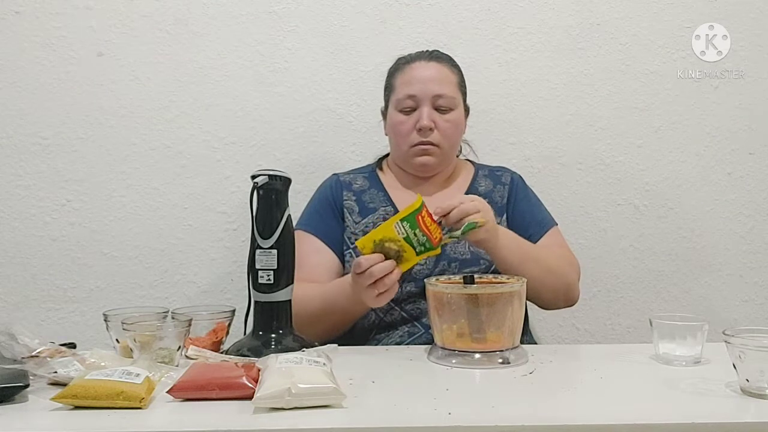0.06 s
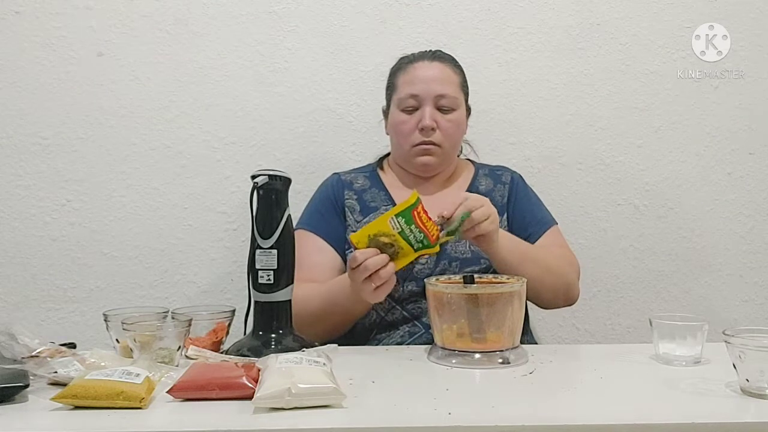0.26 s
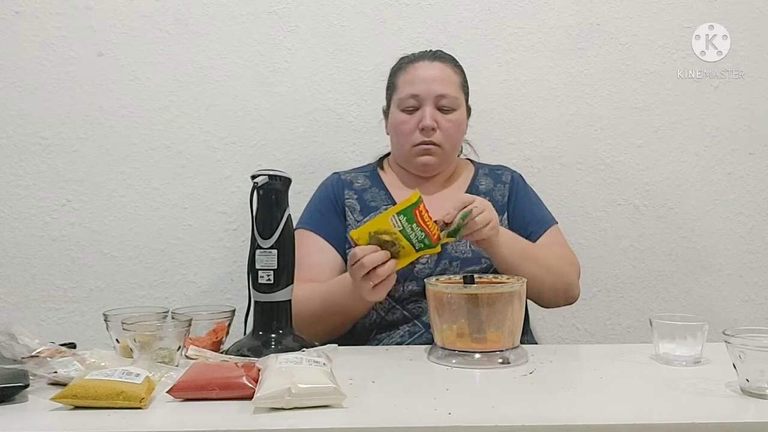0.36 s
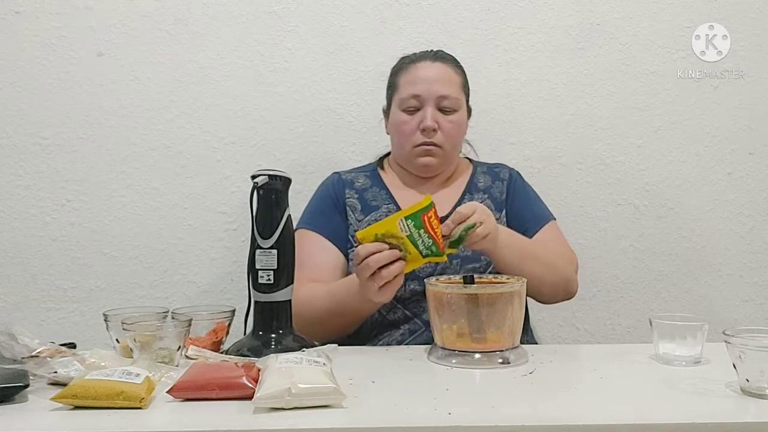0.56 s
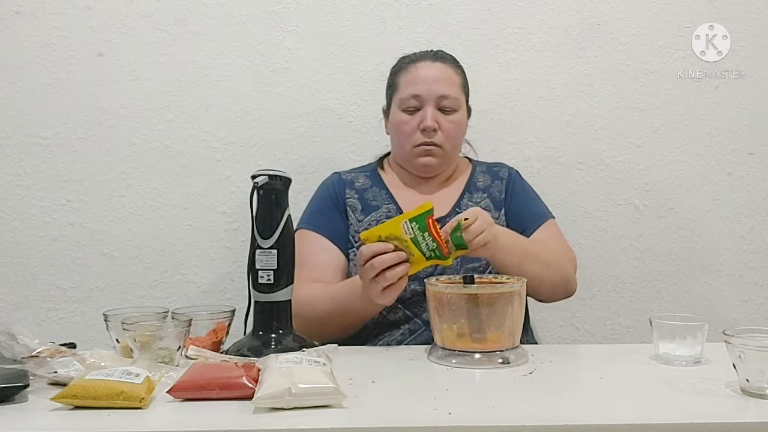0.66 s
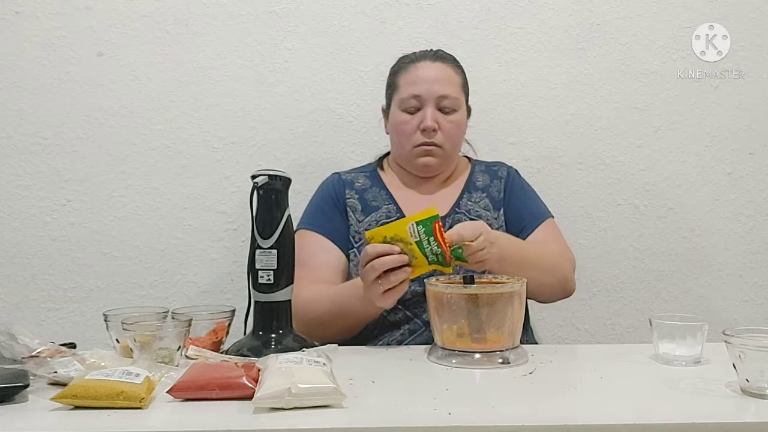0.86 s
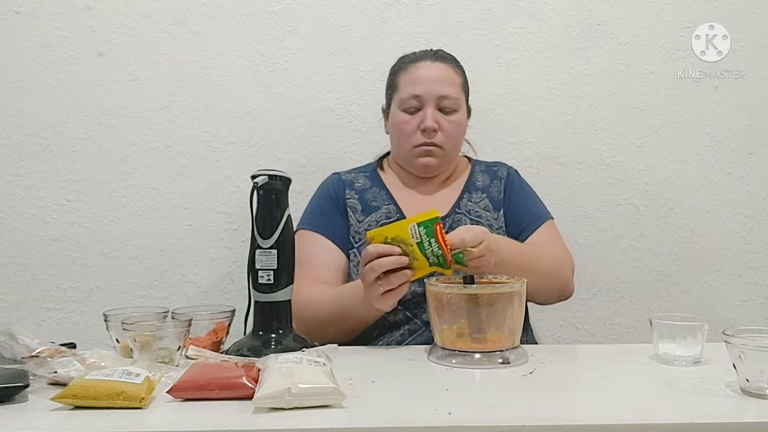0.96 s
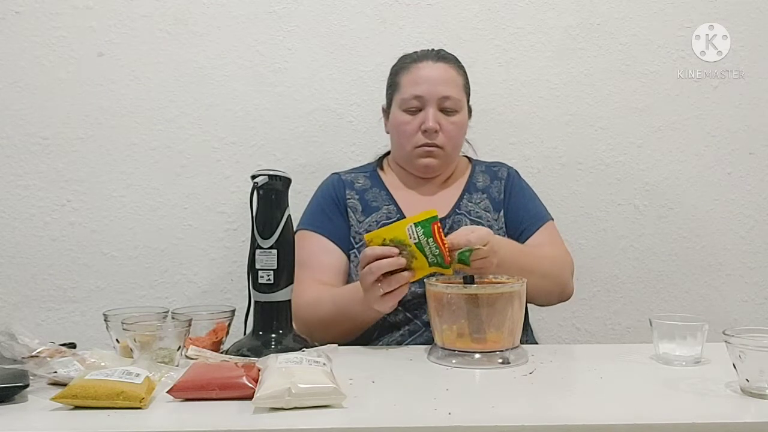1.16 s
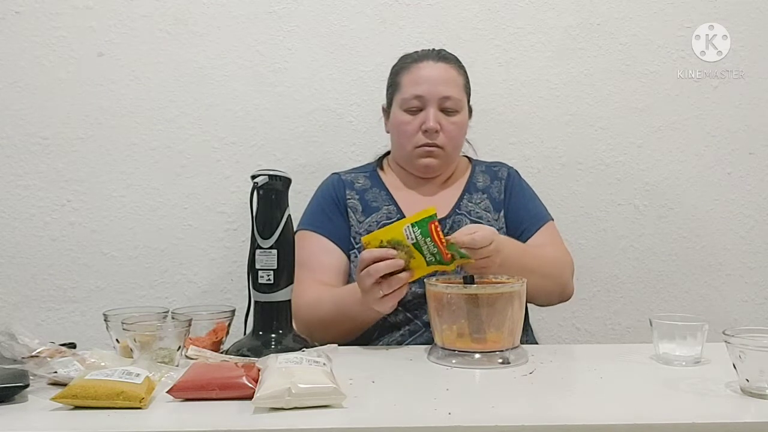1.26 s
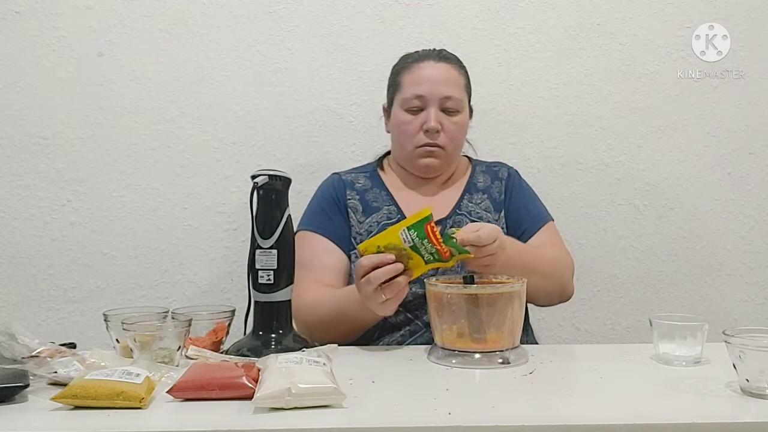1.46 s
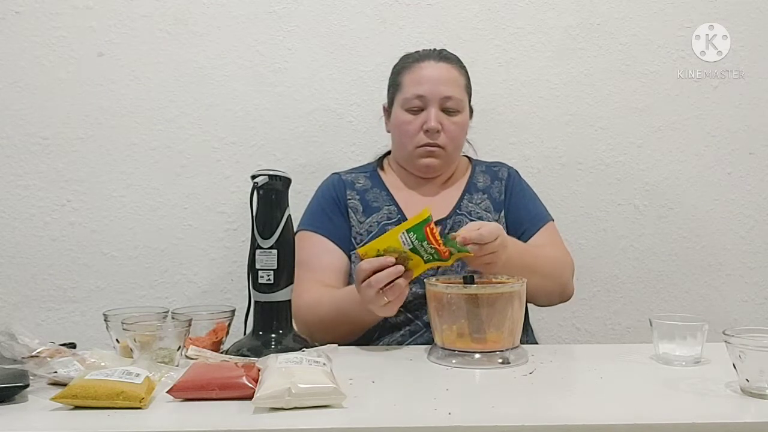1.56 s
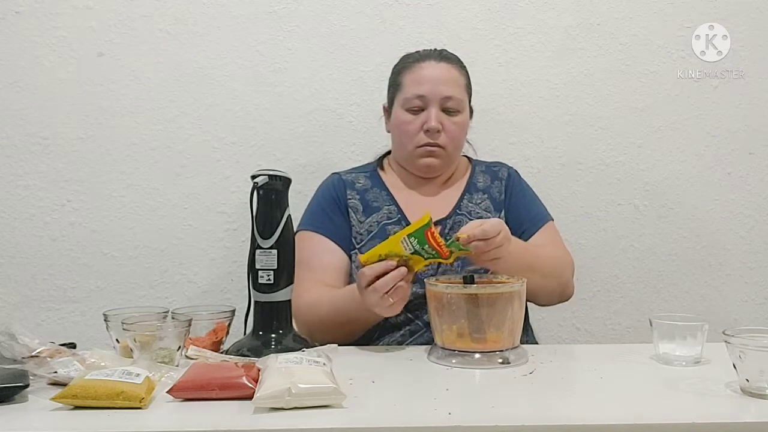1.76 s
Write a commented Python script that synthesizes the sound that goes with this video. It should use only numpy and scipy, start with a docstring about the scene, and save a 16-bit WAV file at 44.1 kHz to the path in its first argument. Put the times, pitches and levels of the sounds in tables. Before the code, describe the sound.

Hands squeeze and tug a plastic packet, giving bright uneven crackles and soft dull bumps, loudest early and again before the middle, then sparser; close microphone, small hard-walled room, very faint hum beneath.

```python
"""A plastic sachet is pulled open and squeezed by hand, close to a microphone in a small kitchen.
Its creases buckle in sharp snaps. Waves in the film carry the treble first, so each snap is a tiny
falling chirp with a click, a finer tick and the flap of a panel. Random tiny slips make the sliding hiss,
crackle and rasps; fading low tones make the pouch's thuds. Fading noise gives the kitchen's echo, a steady
sine the mains hum, and shaped noise the faint room sound."""
import sys
import numpy as np
from scipy import signal
from scipy.fft import rfft, irfft, next_fast_len
from scipy.io import wavfile
from scipy.ndimage import map_coordinates

SR = 44100
rng = np.random.default_rng(int(sys.argv[2]) if len(sys.argv) > 2 else 0)


def log_audio(samples):
    """Write samples as a 16-bit WAV file to the path given in sys.argv[1]."""
    # one column per channel
    frames = np.atleast_2d(samples).T
    # limit to full scale, then quantise
    limited = np.clip(frames, -1, 1)
    pcm = np.round(limited * 32767).astype(np.int16)
    wavfile.write(sys.argv[1], SR, pcm)


N = 79380  # length in samples: 1.8 s

# Room noise, tone balance: (frequency [Hz], relative level [dB])
ROOM_NOISE_TONE = [(20, 18), (45, 46), (100, 10.5), (300, -4), (1000, -22), (3000, -15), (4600, -40.5),
                   (9000, -63), (16000, -31)]
# How long the kitchen's echo takes to fade by 60 dB: (frequency [Hz], fade time [s])
KITCHEN_FADE = [(100, 0.12), (350, 0.57), (1000, 0.27), (3000, 0.32), (9000, 0.34), (16000, 0.29)]
# Tone balance of that echo: (frequency [Hz], gain [dB])
KITCHEN_TONE = [(80, -32), (330, -5), (1000, -2.5), (3000, 1), (9000, -4), (15000, 0)]
# The filled pouch shifting in the grip: (time [s], pitch [Hz], level [dB], time to fade by 60 dB [s])
POUCH_THUDS = [(0.076, 97, -42, 0.13), (0.172, 90, -27.5, 0.067), (0.102, 120, -40, 0.035),
               (.655, 116, -43, 0.079), (0.711, 84, -41, 0.067), (1.54, 116, -46, 0.04)]
# The film rasping as it is pulled: (time [s], length [s], level [dB])
RASP_TIMES = [(0.52, 0.013, -48), (0.628, 0.0077, -38), (0.65, .020, -34.5)]
# Tone balance of a rasp: (frequency [Hz], relative level [dB])
RASP_TONE = [(1000, -16), (3000, -14), (4600, -32), (6200, -3.5), (7500, -0.5), (9500, -2.5), (11500, -15),
             (16000, -22)]
# Film sliding under the fingers: (time [s], hiss level before flutter [dB], crackle level [dB])
SLIDE_LEVELS = [(0, -62.5, -77), (.06, -54.5, -53), (.13, -53.5, -48.5), (.28, -59, -72),
                (0.348, -58, -52.5), (0.428, -64, -63), (0.502, -50, -57.5), (0.581, -57.5, -51.5),
                (.66, -56, -46), (.77, -44, -51.5), (0.839, -49, -49.5), (.90, -66.5, -62.5),
                (1.0, -53.5, -50), (1.13, -51.5, -64), (1.22, -58.5, -58), (1.349, -53.5, -50.5),
                (1.461, -63, -60), (1.55, -51.5, -48.5), (1.66, -57.5, -60.5), (1.8, -58.5, -58)]
# Tone balance of the sliding hiss: (frequency [Hz], relative level [dB])
HISS_TONE = [(800, -5), (2300, -2), (3400, 0.5), (4600, -18), (6000, -3.5), (7500, -1.5), (9000, 3),
             (10500, -3), (12000, -5.5), (15000, -18), (16000, -23)]
# Tone balance of the tiny crackles: (frequency [Hz], relative level [dB])
CRACKLE_TONE = [(40, -10), (120, 4), (300, 2.5), (550, 0), (750, -2.5), (1200, -9), (1900, -13),
                (2400, -10.5), (3400, -17), (4600, -19), (9000, -29), (16000, -37)]
# Creases buckling:
# (time [s], click level [dB], treble tick level [dB], panel pitch [Hz], panel flap level [dB])
CREASE_SNAPS = [(.0478, -45, -63, 800, -76), (0.0761, -39, -72, 695, -55), (0.0795, -48, -64, 480, -47.5),
                (0.0856, -42, -46.5, 338, -40.5), (0.1011, -43, -50, 520, -50),
                (.1180, -31, -33, 1020, -40), (0.1233, -40.5, -39, 326, -58), (0.143, -43, -53, 400, -45),
                (0.1685, -31.5, -58, 1300, -72), (0.1721, -24, -34, 329, -19.5),
                (.1744, -28, -29.5, 708, -27.5), (.2237, -52, -48, 500, -65),
                (0.2603, -42.5, -51, 360, -43.5), (.3490, -50, -54, 556, -55), (0.371, -56, -54, 400, -60),
                (0.476, -47, -67, 1370, -66), (0.5273, -51.5, -61, 650, -48.5), (0.566, -46, -48, 320, -40),
                (.6118, -46.5, -50.5, 530, -44), (0.6392, -42, -57, 330, -50), (0.6892, -36, -93, 650, -43),
                (0.706, -30.5, -36, 650, -32.5), (0.7356, -22, -19, 286, -36.5),
                (0.8147, -52, -43, 1110, -40.5), (0.8348, -43.5, -59, 444, -38.5),
                (.8690, -51.5, -68, 900, -63), (0.9123, -52, -86, 1100, -67),
                (0.941, -43.5, -55.5, 370, -45.5), (0.9553, -42.5, -37, 774, -26),
                (0.9861, -35, -52.5, 462, -34), (1.0154, -45.5, -62, 1080, -40),
                (1.088, -52.5, -86, 1080, -61), (1.1690, -59, -74, 303, -57), (1.1896, -65, -60, 297, -55),
                (1.1957, -49, -85, 304, -43), (1.2252, -51.5, -78, 450, -46),
                (1.2554, -41, -80, 806, -38.5), (1.257, -57, -62, 440, -38),
                (1.2642, -39.5, -58.5, 1120, -66), (1.2951, -35.5, -31.5, 363, -63),
                (1.3193, -41.5, -50, 453, -41), (1.3909, -61, -82, 444, -42),
                (1.5313, -38.5, -51, 335, -35.5), (1.5423, -34.5, -39.5, 453, -37.5),
                (1.5474, -38.5, -31.5, 463, -43.5), (1.6139, -55, -46, 500, -51),
                (1.6464, -59, -46, 510, -67), (1.6506, -58, -56, 477, -48), (1.669, -55, -54, 705, -53),
                (1.6977, -61, -79, 443, -40), (1.7120, -43, -43, 1270, -37.5), (1.712, -50, -69, 281, -42)]
# How the film sends out a click, before dulling: (frequency [Hz], relative level [dB])
CLICK_TONE = [(60, -6), (150, -4), (280, -0.5), (600, -5), (1000, -4), (1300, 2.5), (1900, -5.5), (2400, 8),
              (2800, 0.5), (3400, 9), (4300, -10.5), (6000, -27.5), (16000, 3)]
# How the film sends out a treble tick, before dulling: (frequency [Hz], relative level [dB])
TICK_TONE = [(500, -52), (3000, -15), (4600, -14), (5600, 2), (6500, 0), (7600, 2.5), (8800, 6), (10100, 1),
             (11800, -2.5), (14500, -7), (16000, -24.5)]

HUM_HZ, HUM_DB, ROOM_NOISE_DB = 57.9, -56.5, -70.5
KITCHEN_DB, KITCHEN_BUILD_S = -11.5, 0.0028  # echo gain before its tone balance; time to swell
LOW_CUT_HZ, TOP_HZ = 43, 15550  # limits of the recorder

# Slips per second, and how unevenly loud they are
HISS_PER_S, HISS_SPREAD_DB = 2000, 2.5
CRACKLE_PER_S, CRACKLE_SPREAD_DB = 850, 3
RASP_PER_S, RASP_SPREAD_DB = 2500, 2.5
FLUTTER_PER_S, FLUTTER_DB = 100, 1.5  # the film catches and lets go as it slides

# Travel time of waves at 1 kHz (without the knee), its fall with pitch, and where it levels off
BEND_DELAY_S, BEND_POWER, BEND_KNEE_HZ = 0.00178, 0.913, 416
LEAD_S = 0.0004  # each snap's sound begins this long before its listed time
LEVEL_WINDOW_S = 0.005  # a snap's energy is counted as if spread over this time
PANEL_Q, OVERTONE_RATIO, OVERTONE_DB = 3.13, 2.18, -11.5
EDGE_SHARE, EDGE_SPREAD_S, EDGE_FADE_S = 0.5, 0.002817, 0.0016  # reflections from edges and folds

# Tilt of a click's treble above the knee: base [dB per octave], plus a share of (tick - click) level
CLICK_KNEE_HZ, CLICK_DULL_DB, CLICK_DULLS = 1510, -1.5, 0.49
# Ticks softer than the hard level lose treble, dB per octave for each dB, up to a limit; louder ones gain
TICK_KNEE_HZ, TICK_HARD_DB, TICK_DULLS, TICK_DULLEST_DB = 8500, -18, 1, 6


def amp(db):
    """Turn decibels into a plain multiplier."""
    return 10 ** (np.asarray(db) / 20)


def unit(x):
    """Scale a sound to an average (rms) level of 1."""
    return x / np.sqrt(np.mean(x ** 2) + 1e-20)


def along(points, hz):
    """Read a curve of (frequency, value) points, with octaves evenly spaced."""
    f, v = np.transpose(points)
    return np.interp(np.log(hz + 1), np.log(f + 1), v)


def filtered(x, response):
    """Change each frequency's strength and timing by a given response."""
    m = next_fast_len(N + SR // 2)  # spare room so the end does not wrap onto the start
    spectrum = rfft(x, m) * response(np.fft.rfftfreq(m, 1 / SR))
    return irfft(spectrum, m)[..., :N]


def causal(db):
    """Make a response with these gains that starts at once, with no sound ahead of its cause."""
    c = irfft(np.log(amp(db) + 1e-6))
    half = len(c) // 2
    c[1:half] *= 2
    c[half + 1:] = 0
    return np.exp(rfft(c))


def bending(hz):
    """Bending waves in the film: low frequencies travel slower and arrive late."""
    delay = BEND_DELAY_S * (1000 / np.hypot(hz, BEND_KNEE_HZ)) ** BEND_POWER
    turns = np.cumsum(delay) * hz[1]  # adding up delay over frequency gives phase
    return np.exp(-2j * np.pi * turns)


def add(track, s, sound):
    """Mix a sound into the track at time s."""
    i = max(round(s * SR), 0)
    part = track[i:i + len(sound)]
    part += sound[:len(part)]


def slips(per_s, spread_db):
    """Tiny stick-and-slip jumps: random single-sample pulses of uneven size."""
    uneven_db = spread_db * np.clip(rng.standard_normal(N), -2, 2)
    size = amp(uneven_db) * rng.choice([-1, 1], N)
    return size * (rng.random(N) < per_s / SR)


def background():
    """An appliance's mains hum is one steady sine; the room sound is noise, strongest in the bass."""
    hum = unit(np.sin(2 * np.pi * (HUM_HZ * np.arange(N) / SR + rng.random())))
    air = unit(filtered(rng.standard_normal(N), lambda hz: amp(along(ROOM_NOISE_TONE, hz))))
    return amp(HUM_DB) * hum + amp(ROOM_NOISE_DB) * air


def kitchen(x):
    """Bare walls answer with a short tail: noise that swells, then fades at each frequency's own pace."""
    hz, t, noise = signal.stft(rng.standard_normal(SR // 2), SR, nperseg=256)
    swell = 1 - np.exp(-(t / KITCHEN_BUILD_S) ** 2)
    fade = np.exp(-np.log(1000) * t / along(KITCHEN_FADE, hz)[:, None])
    tail = signal.istft(noise * fade * swell, SR, nperseg=256)[1]
    wet = signal.fftconvolve(x, tail / np.linalg.norm(tail))[:N]
    return amp(KITCHEN_DB) * filtered(wet, lambda hz: amp(along(KITCHEN_TONE, hz)))


def thuds():
    """When the grip slips, the filled pouch gives a soft bump: a low tone that fades quickly."""
    out, t = np.zeros(N), np.arange(SR // 4) / SR
    for s, hz, db, fade_s in POUCH_THUDS:
        fade = np.exp(-np.log(1000) * t / fade_s)
        soft_start = 1 - np.exp(-t / 0.0016)
        add(out, s, amp(db) * fade * soft_start * np.sin(2 * np.pi * hz * t))
    return out


def rasps():
    """Film pulled hard gives short runs of dense ticks, each run swelling and dying away."""
    t, loudness = np.arange(N) / SR, np.zeros(N)
    ticks = unit(filtered(slips(RASP_PER_S, RASP_SPREAD_DB),
                          lambda hz: causal(along(RASP_TONE, hz)) * bending(hz)))
    for s, length, db in RASP_TIMES:
        progress = np.clip((t - s) / length, 0, 1)
        loudness += amp(db) * np.sqrt(np.abs(np.sin(np.pi * progress)))
    return ticks * loudness


def sliding():
    """Film sticking and slipping under the fingers: a fine hiss and tiny chirping crackles."""
    t = np.arange(N) / SR
    s, hiss_db, crackle_db = np.transpose(SLIDE_LEVELS)
    hiss = unit(filtered(slips(HISS_PER_S, HISS_SPREAD_DB), lambda hz: causal(along(HISS_TONE, hz))))
    crackle = unit(filtered(slips(CRACKLE_PER_S, CRACKLE_SPREAD_DB),
                            lambda hz: causal(along(CRACKLE_TONE, hz)) * bending(hz)))
    wander = rng.standard_normal(N // 100)
    flutter_db = FLUTTER_DB * map_coordinates(wander, [t * FLUTTER_PER_S], mode="wrap")
    hiss_gain = amp(np.interp(t, s, hiss_db) + flutter_db)
    return hiss * hiss_gain + crackle * amp(np.interp(t, s, crackle_db))


def levelled(response, db):
    """Give a short sound the energy of a steady one at this level lasting the level window."""
    return response * amp(db) * np.sqrt(LEVEL_WINDOW_S * SR / np.sum(irfft(response) ** 2))


def panel_mode(hz, pitch):
    """A panel of film rings briefly at its pitch, with the far bass and treble weakened."""
    damping = 1j * hz * pitch / PANEL_Q
    ringing = damping / (pitch ** 2 - hz ** 2 + damping)
    less_bass = (2j * hz / pitch) / (1 + 2j * hz / pitch)
    less_treble = 1 / (1 + 0.5j * hz / pitch) ** 2
    return ringing * less_bass * less_treble


def film_edges(hz, count=8):
    """Edges and folds throw back fading copies, some upside down, at random short delays."""
    place, sign = rng.random((2, count, 1))
    lag = EDGE_SPREAD_S * (np.arange(count)[:, None] + place) / count
    copies = np.sign(sign - 0.5) * np.exp(-lag / EDGE_FADE_S - 2j * np.pi * hz * lag)
    return 1 + EDGE_SHARE * np.sum(copies, axis=0)


def snaps(size=4096):
    """A buckling crease gives a click, tick and flap, spread into a chirp by the film.
    Returns the sound towards the microphone, coloured by the edges, and the even sound sent into the room."""
    out, hz = np.zeros((2, N)), np.fft.rfftfreq(size, 1 / SR)
    chirp = bending(hz)
    click_octaves = np.log2(np.maximum(hz / CLICK_KNEE_HZ, 1))
    tick_octaves = np.log2(np.maximum(hz / TICK_KNEE_HZ, 1))
    for s, click_db, tick_db, panel_hz, panel_db in CREASE_SNAPS:
        edges = film_edges(hz)
        tick_loss = min(TICK_DULLS * (TICK_HARD_DB - tick_db), TICK_DULLEST_DB)
        tick = causal(along(TICK_TONE, hz) - tick_loss * tick_octaves)
        click_tilt = CLICK_DULL_DB + CLICK_DULLS * (tick_db - click_db)
        click = causal(along(CLICK_TONE, hz) + click_tilt * click_octaves)
        overtone = amp(OVERTONE_DB) * panel_mode(hz, OVERTONE_RATIO * panel_hz)
        panel = levelled(panel_mode(hz, panel_hz) + overtone, panel_db)
        for track, colour in zip(out, (edges, 1)):
            wave = levelled(click * colour, click_db) + levelled(tick * colour, tick_db) + panel
            add(track, s - LEAD_S, irfft(wave * chirp)[:size // 2])
    return out


def scene():
    """The sachet is straight ahead, so both channels are alike."""
    direct, radiated = snaps()
    handling = sliding() + rasps() + thuds()
    mono = direct + handling + kitchen(radiated + handling) + background()
    return np.array([mono, mono])


def record(dry):
    """The recorder cuts the deepest bass and sharply removes the top treble."""
    bass_cut = signal.butter(4, LOW_CUT_HZ, "high", fs=SR, output="sos")
    thinned = signal.sosfilt(bass_cut, dry)
    return filtered(thinned, lambda hz: 1 / np.sqrt(1 + (hz / TOP_HZ) ** 200))


dry = scene()
out = record(dry)
log_audio(out)
```